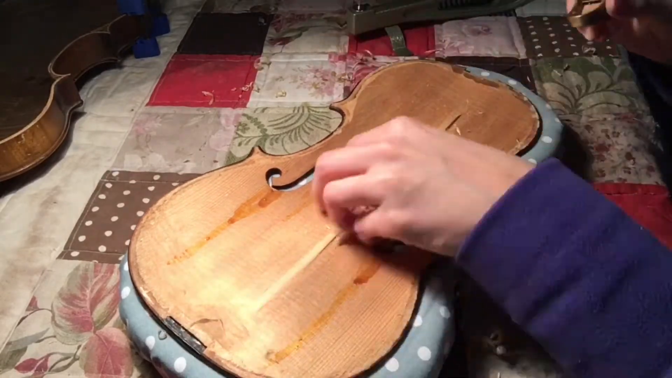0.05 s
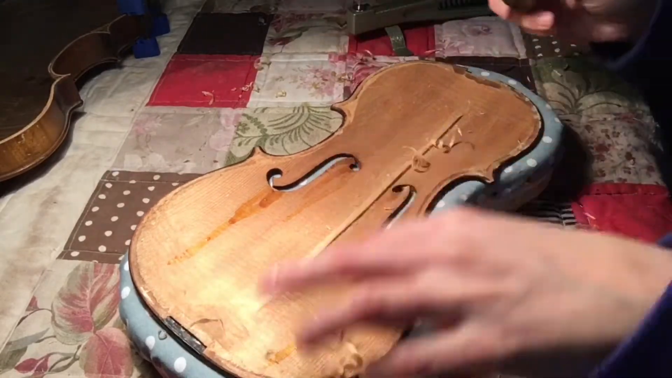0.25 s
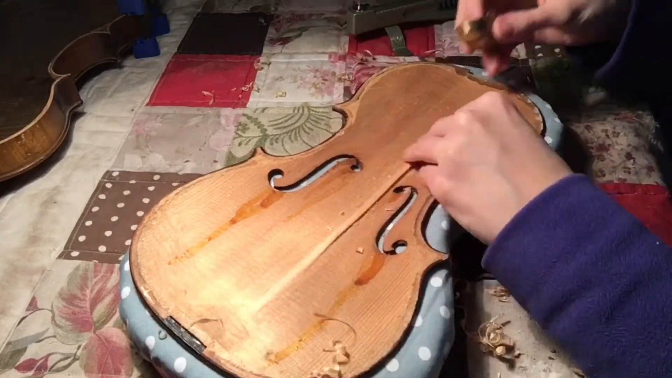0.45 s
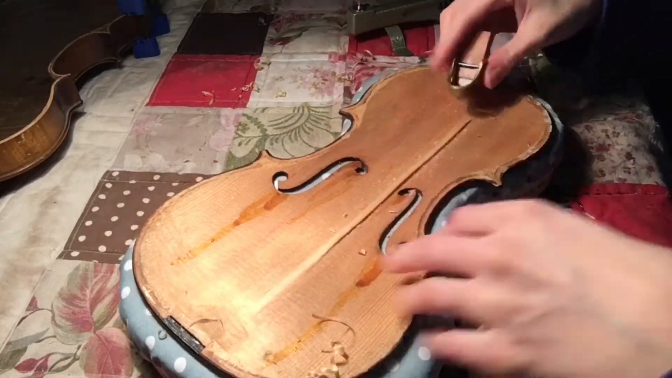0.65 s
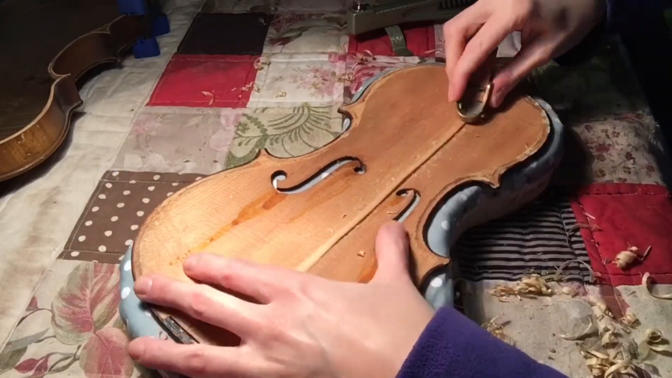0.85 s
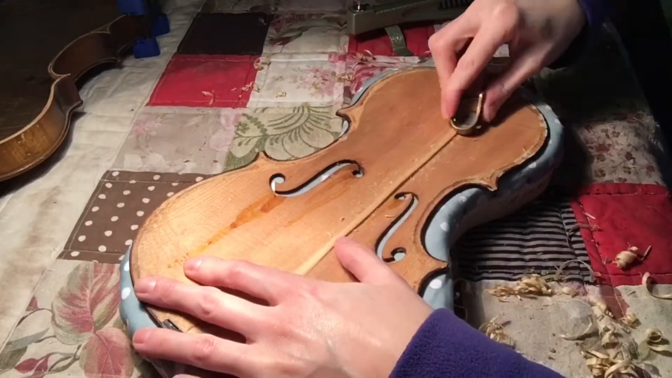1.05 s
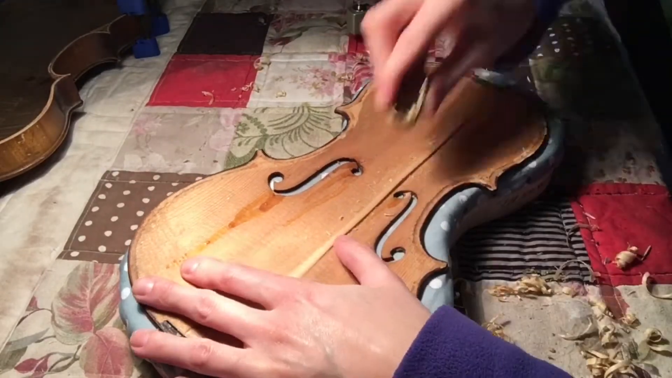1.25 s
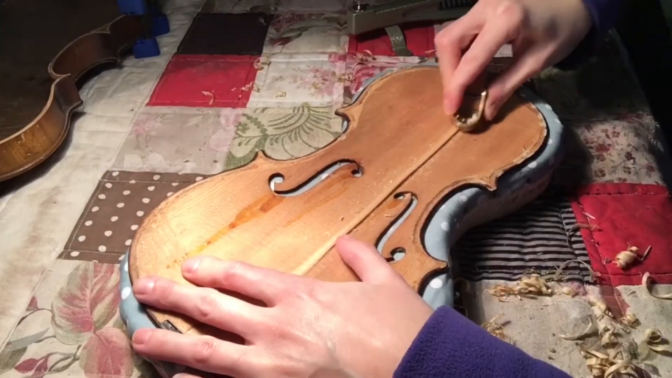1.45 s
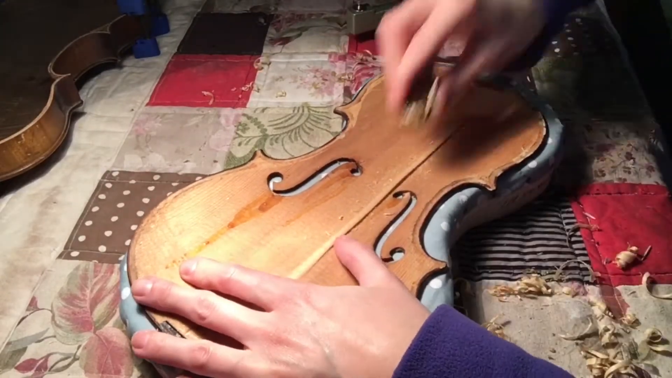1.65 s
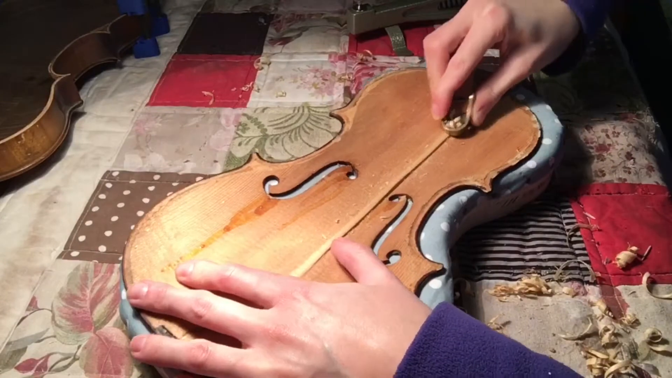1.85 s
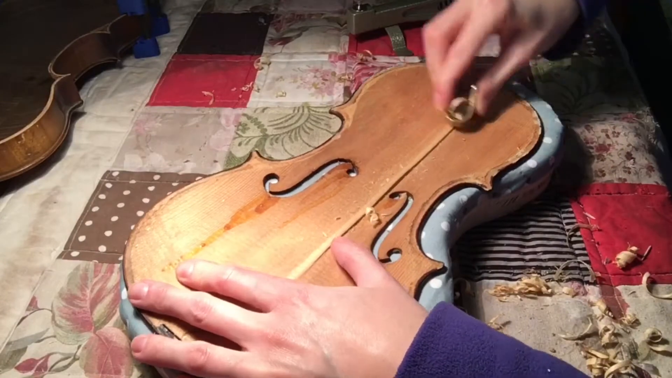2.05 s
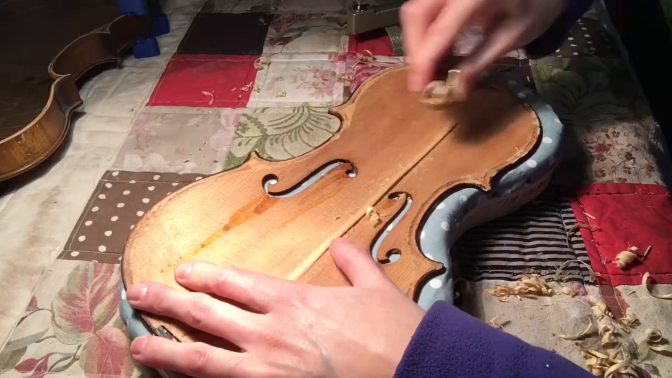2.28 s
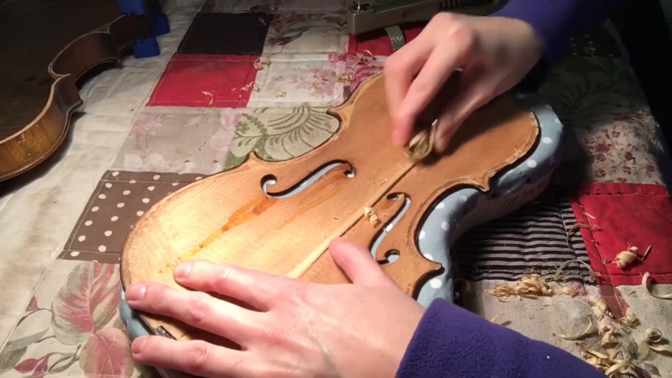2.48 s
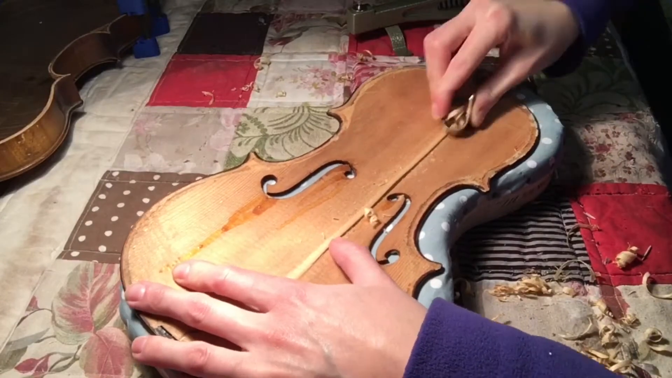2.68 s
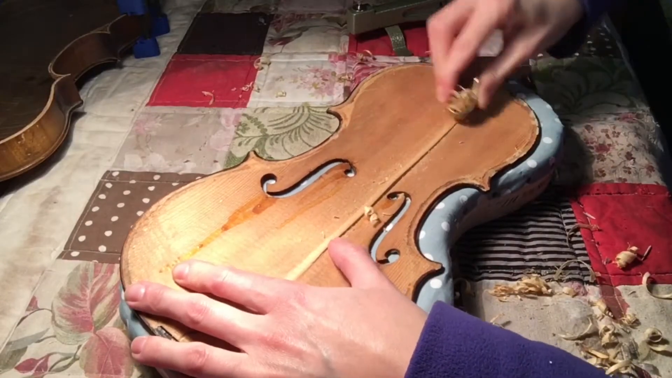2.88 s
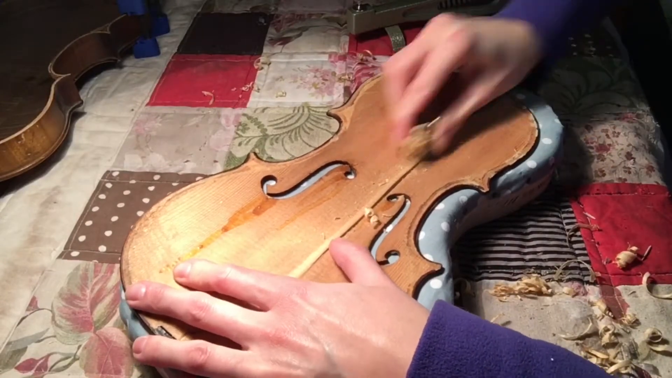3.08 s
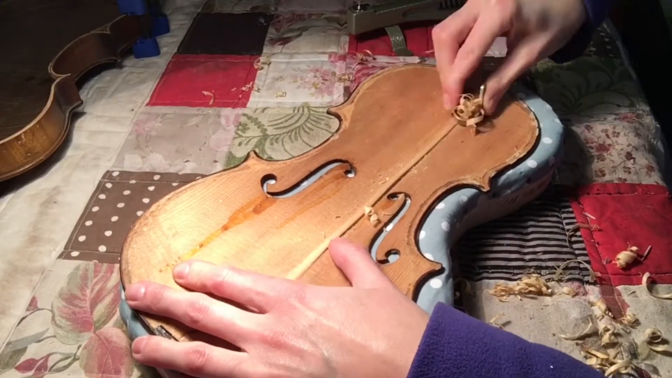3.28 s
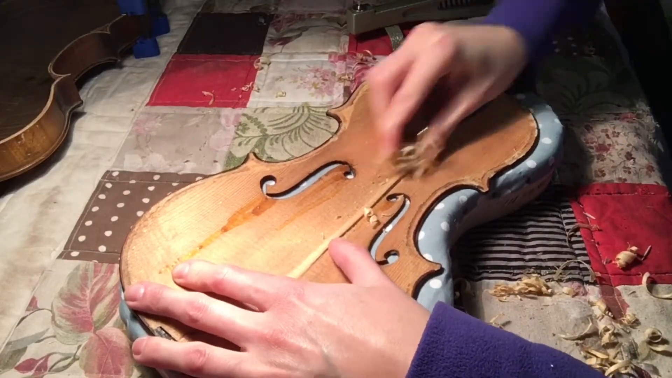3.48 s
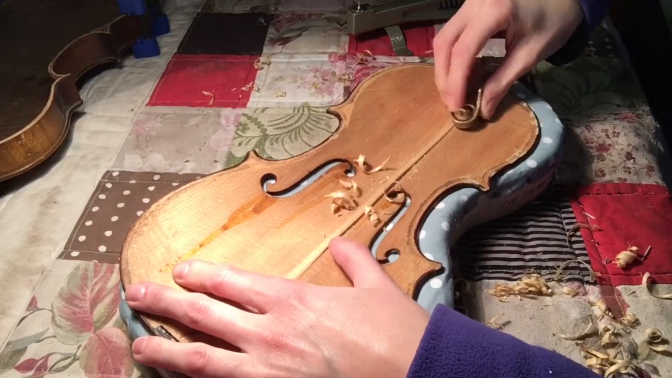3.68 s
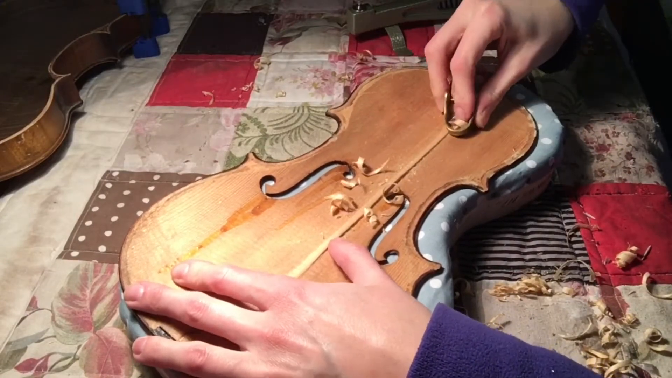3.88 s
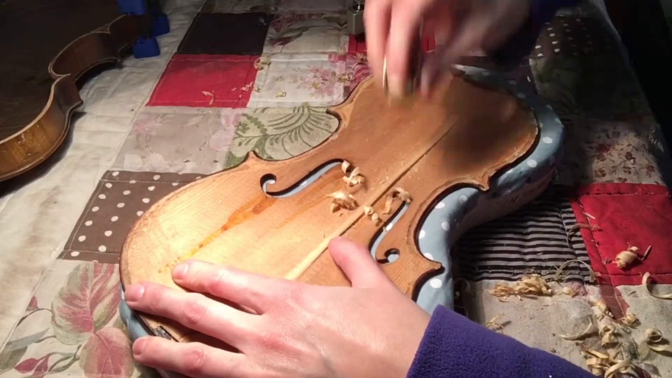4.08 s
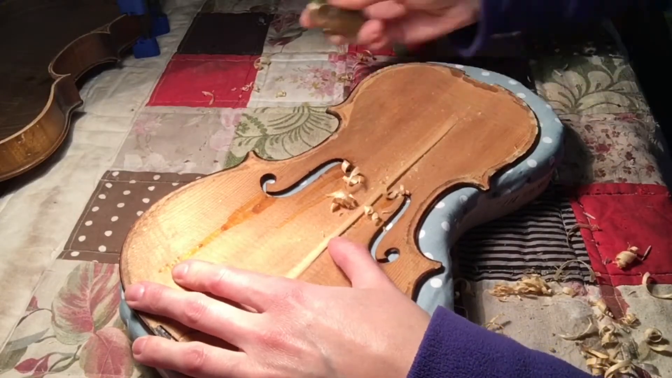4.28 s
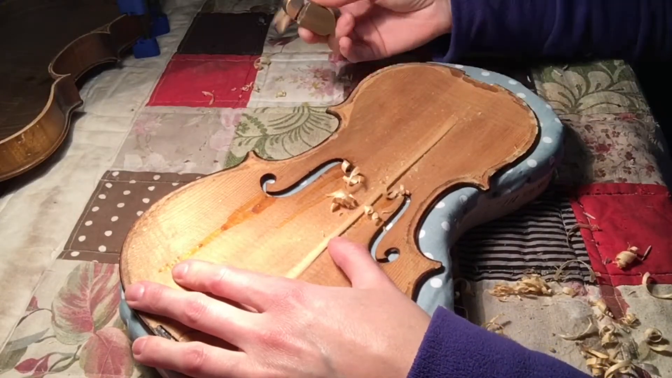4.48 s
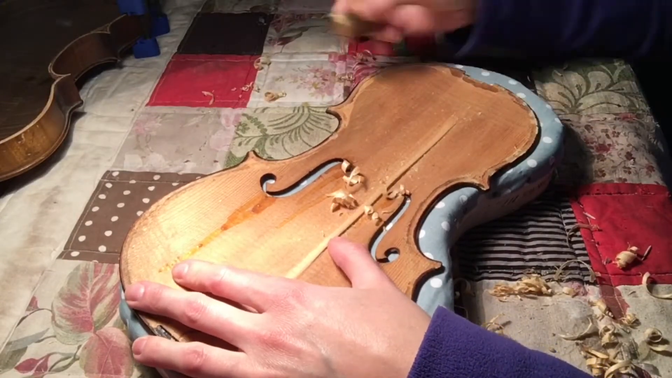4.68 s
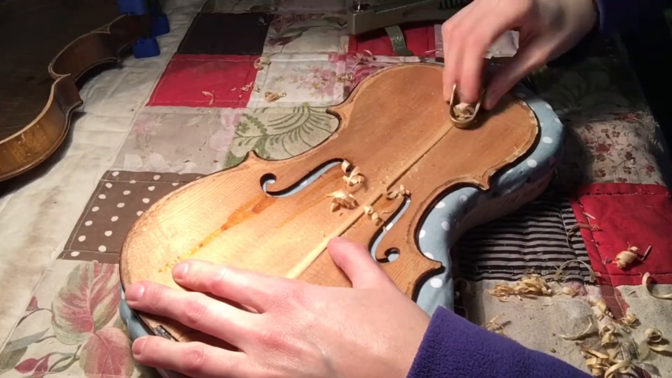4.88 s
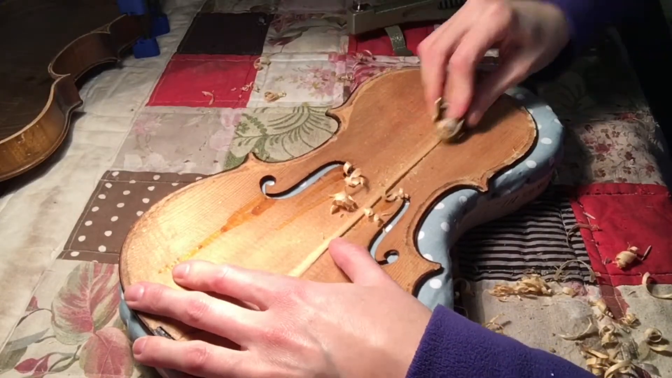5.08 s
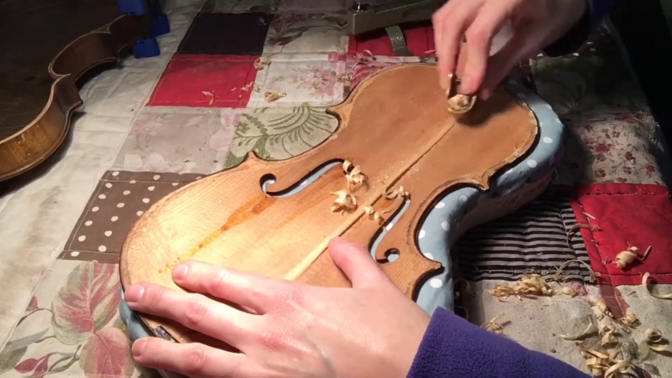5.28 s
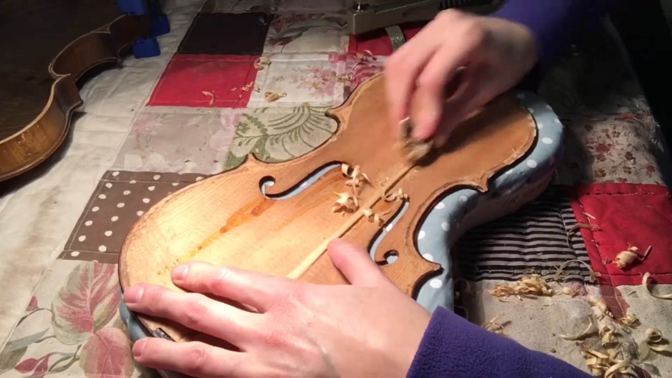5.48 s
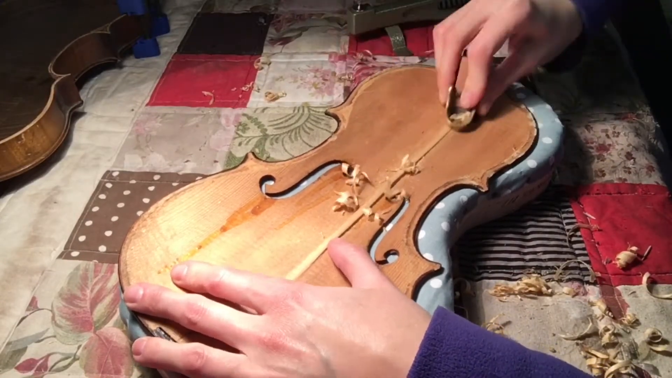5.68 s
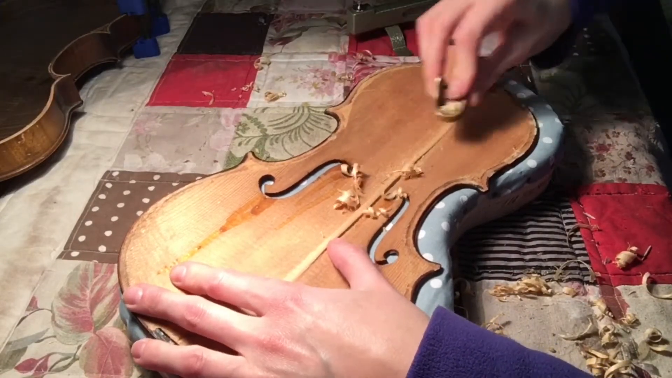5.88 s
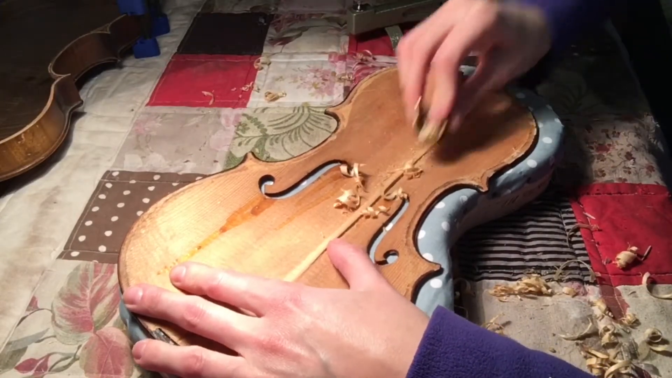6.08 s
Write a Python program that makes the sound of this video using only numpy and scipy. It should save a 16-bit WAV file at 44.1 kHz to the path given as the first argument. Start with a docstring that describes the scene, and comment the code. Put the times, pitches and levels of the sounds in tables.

```python
"""A small, quiet workshop: a thumb plane shaves the spruce top of a violin that lies on a padded bench.
A hand first sweeps the shavings off. Then the plane, often set down with a tap, slides with a hiss stroke by stroke.
Uneven slips of its blade make a low judder; snapping fibres and a ragged squeak make the dry rasp that follows.
Resonances of the plane and the wooden box ring along, and a short room tail and faint air noise lie behind."""
import sys
import numpy as np
from scipy import signal
from scipy.fft import rfft, irfft, next_fast_len
from scipy.io import wavfile
from scipy.ndimage import uniform_filter1d, map_coordinates

SR = 44100
rng = np.random.default_rng(int(sys.argv[2]) if len(sys.argv) > 2 else 0)


def output_pcm(signal):
    """Save a mono or channel-first signal as 16-bit PCM at the path in sys.argv[1].

    Samples are clipped to [-1, 1] before scaling.
    """
    pcm = np.clip(np.atleast_2d(signal).T, -1, 1) * 32767
    wavfile.write(sys.argv[1], SR, np.round(pcm).astype(np.int16))


N = 270774

# All levels in the tables are relative: the functions below still scale or filter them.

# Strokes of the plane. Each row: moment the blade bites in seconds, run-up of the sole in seconds,
# lead-in of the blade in seconds, length of the judder in seconds, length of the cut in seconds,
# hiss at first touch in dB, hiss in the cut in dB, judder in dB, rasp in dB, thud in dB,
# base slip rate in Hz, base rasp pitch in Hz (both glide around these values).
STROKES = [(1.197, 0.078, .06, 0.034, 0.057, -71, -42, -38, -30, -47, 360.3, 1380),
           (1.602, 0.034, 0.033, 0.034, .054, -53.5, -43.5, -34.5, -33, -48.5, 402, 1390),
           (1.931, 0.093, 0.024, 0.028, .055, -62.5, -43.5, -34, -34.5, -47.5, 440.4, 1380),
           (2.207, 0.047, 0.014, .03, .06, -62, -42.5, -29.5, -33.5, -60, 311.4, 1490),
           (2.479, 0.063, 0.032, 0.039, 0.053, -64, -44, -31, -37, -51, 380.3, 1620),
           (2.755, 0.042, 0.017, 0.058, .066, -61, -43.5, -38.5, -32, -51.5, 429, 1380),
           (3.106, 0.042, 0.02, 0.03, 0.055, -60, -42.5, -31.5, -34, -48, 370.5, 1500),
           (3.485, 0.055, 0.044, .048, 0.067, -57, -43.5, -35, -32.5, -48.5, 378.5, 1430),
           (3.995, 0.12, 0.072, 0.047, .08, -70.5, -43, -38, -32.5, -44.5, 350.2, 1199),
           (5.128, 0.073, 0.049, 0.039, 0.064, -62.5, -42.5, -34, -35, -45.5, 301.7, 1390),
           (5.468, 0.093, 0.038, 0.07, 0.08, -58.5, -45, -38, -36, -47.5, 329.8, 1420),
           (5.783, .06, 0.01, 0.026, 0.071, -63, -42, -35, -38, -44, 461.5, 1520),
           (6.036, 0.034, 0.054, 0.077, 0.062, -64, -43, -41, -40, -47, 368.8, 1300)]
# Stages of a cut. Each list: level in dB at the first graze, lead-in, bite, turn from judder to rasp,
# blade leaving, chip breaking off, and end.
JUDDER_STAGES_DB = [-31.5, -17.5, 2, -2, -10.5, -22.5, -40]
RASP_STAGES_DB = [-38, -30.5, -13, 0.5, 1, -5.5, -52]
# The plane is set down, or once (at 2.925 seconds) drags dully.
# Each row: start in seconds (the contact peaks slightly later), hollow knock in dB, clack in dB,
# gritty tick in dB.
CONTACTS = [(0.711, -87, -54, -54), (1.039, -62, -55.5, -69), (1.135, -52, -43, -55),
            (1.813, -48, -58.5, -68), (2.124, -39, -42.5, -57.5), (2.408, -40, -36, -61),
            (2.676, -43.5, -43.5, -54.5), (2.925, -62, -65.5, -85), (3.722, -37, -36.5, -55.5),
            (5.38, -42, -45, -61), (5.716, -44.5, -41, -53.5), (5.984, -41, -47, -67.5),
            (6.004, -53, -40, -58)]
# The sole drags lightly as it is drawn back and lined up.
# Each row: start in seconds, rise in seconds, hold in seconds, fall in seconds, level in dB.
DRAGS = [(.855, 0.037, 0.037, 0.11, -64.5), (.965, 0.05, 0.026, 0.11, -62.5),
         (1.466, 0.035, .008, .07, -60.5), (1.53, 0.045, .008, 0.033, -55),
         (2.995, 0.048, 0.021, .027, -56), (3.375, 0.063, .015, 0.068, -60.5),
         (4.94, .03, 0.0053, 0.047, -65.5), (5.032, 0.046, 0.0068, .025, -63.5)]
# The sole scuffs while it feels for its line.
# Each row: start in seconds, length in seconds, average pitch in Hz, level in dB.
SCUFFS = [(0.872, 0.025, 360, -70), (0.926, 0.019, 1337, -60), (0.978, 0.036, 1438, -57.5),
          (1.046, .08, 960, -52), (1.087, 0.029, 1550, -39), (1.546, 0.016, 944, -46.5),
          (1.882, 0.029, 1547, -42), (3.888, 0.019, 2130, -54), (3.945, 0.02, 526, -43.5),
          (4.942, 0.035, 960, -59.5)]
# The hand sweeps over the plate.
# Each row: start in seconds, rise in seconds, hold in seconds, fall in seconds, level in dB.
SWEEPS = [(.1, 0.041, 0.041, 0.099, -44.5), (.2, 0.044, 0.0056, 0.022, -54.5), (.24, .04, 0.043, 0.25, -68),
          (.465, .04, 0.075, 0.061, -52.5), (.6, .04, 0.0064, 0.039, -50),
          (.69, 0.023, 0.0034, 0.021, -57.5), (.716, .012, .004, 0.015, -53.5)]
# Loose shavings rustle as the plane is lifted and cleared.
# Each row: start in seconds, rise in seconds, hold in seconds, fall in seconds, level in dB.
RUSTLES = [(3.765, 0.053, 0.011, 0.074, -64), (4.13, .05, 0.035, 0.036, -63.5),
           (4.245, 0.051, 0.019, 0.044, -78), (4.447, 0.031, .008, 0.065, -71.5),
           (4.503, 0.037, 0.018, 0.036, -60), (4.65, 0.017, 0.044, 0.042, -70.5),
           (5.657, .02, .005, 0.023, -68)]

# Resonances of the plane and the plate under it. Each row: frequency in Hz, width in Hz, level in dB.
BLADE_MODES = [(2042, 35, -1.5), (2833, 63, 2.5), (3496, 120, -3.5), (4096, 280, -4.5), (5580, 340, -7.5),
               (5900, 230, -36), (8700, 310, -14)]
# Resonances of the violin box on its pad. Each row: frequency in Hz, width in Hz, level in dB.
BOX_MODES = [(58.6, 3.9, 1.5), (98.6, 12, -2.5), (141.2, 8.9, -2), (193, 23, 3), (248.7, 6.3, -3.5),
             (323.5, 15, -1), (478.6, 44, -3), (645, 22, -0.5), (950, 18, -27), (1096, 14, -16),
             (1347, 15, -8), (1480, 28, -10.5), (1570, 60, -16)]

# Colours: how strong each noise is from bass to treble. Each row: frequency in Hz, level in dB.
# First the cut: low judder, tearing fibres, the violin rocking on its pad, the sliding sole.
JUDDER_COLOUR = [(50, -19), (120, -10.5), (200, -0.5), (330, 2.5), (480, 1.5), (630, -6), (800, -14.5),
                 (1500, -22), (4000, -35), (15000, -65)]
RASP_COLOUR = [(60, -31), (230, -3.5), (560, -12.5), (800, -11), (1000, -3), (1350, 1.5), (1630, 6),
               (1900, -9), (2400, -13), (3300, -28), (6000, -39.5)]
THUD_COLOUR = [(25, -41.5), (45, -25), (59, 8), (75, -4.5), (100, 0), (120, 1), (141, 5.5), (170, -8),
               (300, -15), (1000, -70.5)]
HISS_COLOUR = [(80, 2), (300, 8.5), (550, 3.5), (800, 4.5), (1550, 6.5), (2400, -3.5), (4000, -1.5),
               (6300, -2.5), (7200, -4), (7900, -10), (9000, -10), (11000, -15), (13000, -18), (16000, -20)]
# Colours of a contact, same columns: hollow knock, clack, gritty tick.
KNOCK_COLOUR = [(60, -26.5), (200, -7.5), (270, -1), (370, -2), (460, 7), (640, -3), (900, -7.5),
                (3000, -80)]
CLACK_COLOUR = [(300, -20.5), (700, -6.5), (950, -3), (1200, -1.5), (1600, 4.5), (1850, -17.5), (2100, -4),
                (2500, -19), (3300, -19), (5000, -50), (10000, -43)]
TICK_COLOUR = [(1000, -22.5), (2700, 6), (4200, 7), (5500, 3), (7000, 2), (10000, -15.5), (16000, -26.5)]
# Colours of the rest, same columns: sweeping palm, dry curls of wood, faint air noise.
PALM_COLOUR = [(150, -21), (250, -23), (335, -18), (442, -13.5), (583, -14.5), (1070, -3), (1250, -8),
               (1460, -5.5), (2360, -11.5), (3330, -8), (3890, -13), (6000, -13.5), (8470, -23.5),
               (15500, -26.5)]
CURLS_COLOUR = [(700, -11), (1800, -0.5), (4000, 1.5), (6200, 5.5), (9000, -4.5), (15000, -4.5)]
AIR_COLOUR = [(15, -24), (25, -30), (37, -6), (59, 2), (82, -14.5), (129, -7), (164, -12), (246, -9.5),
              (281, -18), (331, -12), (389, -17), (457, -17.5), (1850, -21.5), (15500, -41.5)]

# a rise or fall time in the tables covers this many dB
FADE_DB = 20
# the hiss fades in before the touch, is full shortly after the bite, and dies as the plane lifts
TOUCH_S, FULL_AFTER_BITE_S, LIFT_DB_PER_S = 0.011, 0.011, 580
# graze before the lead-in; chip breaking and silence after the blade leaves
GRAZE_S, BREAK_S, SETTLE_S = 0.058, 0.0067, 0.068
# air noise before the recorder's filters, and the recorder's upper limit
AIR_DB, TOP_HZ = -72, 15750

# time axis in seconds and frequency axis in Hz
T = np.arange(N) / SR
SIZE = next_fast_len(N + SR)
FREQ = np.maximum(np.arange(SIZE // 2 + 1) * SR / SIZE, 1)


def undb(db):
    """Turn decibels into gain."""
    return 10 ** (np.asarray(db) / 20)


def unit(x):
    """Scale to an rms (average strength) of 1."""
    return x / np.sqrt(np.mean(x ** 2))


def noise():
    """White noise: all frequencies equally strong, rms about 1."""
    return rng.standard_normal(N)


def swell(times, dbs):
    """Gain through points in seconds and dB, practically silent outside them."""
    return undb(np.interp(T, times, dbs, left=-200, right=-200))


def gestures(rows):
    """Gain of light movements that each rise, hold and fall."""
    power = 0
    for start, rise, hold, fall, db in rows:
        before = np.maximum(start - T, 0) / rise
        after = np.maximum(T - start - hold, 0) / fall
        level_db = db - FADE_DB * np.minimum(before + after, 10)
        power = power + undb(level_db) ** 2
    return np.sqrt(power)


def colour(points):
    """Frequency response through points in Hz and dB that never sounds ahead of its input."""
    hz, db = np.transpose(points)
    smooth_db = np.interp(np.log(FREQ), np.log(hz), db)
    # folding the cepstrum (spectrum of the log spectrum) gives minimum phase
    cepstrum = irfft(np.log(undb(smooth_db)), SIZE)
    cepstrum[1:SIZE // 2] *= 2
    cepstrum[SIZE // 2 + 1:] = 0
    return np.exp(rfft(cepstrum))


def modes(rows):
    """Frequency response of resonances; a narrower one rings longer."""
    response = 0
    for hz, width, db in rows:
        response = response + undb(db) / (1 + 1j * (FREQ ** 2 - hz ** 2) / (FREQ * width))
    return response


def through(x, response):
    """Filter by a frequency response."""
    return irfft(rfft(x, SIZE) * response, SIZE)[:N]


def ring(x, response):
    """Filter by a response scaled to keep the power of white noise."""
    return through(x, response / np.sqrt(np.mean(np.abs(response) ** 2)))


def fibres(per_s, spread_db):
    """Dense clicks of snapping wood fibres, at random moments and uneven in size."""
    size = undb(spread_db * np.clip(noise(), -2, 2))
    snaps = rng.random(N) < per_s / SR
    return unit(snaps * size * np.sign(noise()))


def steady(x, span_s):
    """Even out the power over span_s seconds: the hand pushes with a steady force."""
    return x / np.sqrt(uniform_filter1d(x ** 2, int(span_s * SR)) + 1e-12)


def stick_slip(hz, jitter, spread_db):
    """The blade sticks and slips: uneven clicks, and the phase from 0 to 1 between two slips."""
    wander = unit(uniform_filter1d(noise(), size=130))
    turns = np.cumsum(hz * np.exp(jitter * wander)) / SR
    # one click per whole turn
    slips = np.diff(np.floor(turns), prepend=0) * undb(spread_db * noise())
    without_drift = slips - uniform_filter1d(slips, size=600)
    return without_drift, turns % 1


def squeak(hz, jitter, flutter_db, octave_db):
    """Fast, ragged stick-slip: a tone and its second harmonic, wavering so quickly that they rasp."""
    wander = unit(uniform_filter1d(noise(), size=70))
    angle = 2 * np.pi * np.cumsum(hz * np.exp(jitter * wander)) / SR
    strength = undb(flutter_db * unit(uniform_filter1d(noise(), size=110)))
    tone = np.sin(angle) + undb(octave_db) * np.sin(2 * angle)
    return unit(strength * tone)


def cutting():
    """Each stroke: the blade judders ever more slowly as it digs in, then tears fibres until it leaves the wood."""
    judder_gain, rasp_gain, thud_gain = 0, 0, 0
    times, rates, pitches = [], [], []
    for bite, _, lead, judder_s, cut_s, _, _, judder_db, rasp_db, thud_db, slip_hz, rasp_hz in STROKES:
        leave = bite + cut_s
        moments = np.sort([bite - lead - GRAZE_S, bite - lead, bite, bite + judder_s,
                           leave, leave + BREAK_S, leave + SETTLE_S])
        judder_gain = judder_gain + swell(moments, judder_db + np.array(JUDDER_STAGES_DB))
        rasp_gain = rasp_gain + swell(moments, rasp_db + np.array(RASP_STAGES_DB))
        thud_times = [bite - .12, bite, leave, leave + 0.1]
        thud_gain = thud_gain + swell(thud_times, thud_db + np.array([-25.5, -3.0, 0, -28.5]))
        # slips and squeak both slow down during the cut
        times += [bite - .02, leave]
        rates += [slip_hz * 1.02, slip_hz * .66]
        pitches += [rasp_hz * 1.16, rasp_hz * .95]

    slips, phase = stick_slip(np.interp(T, times, rates), jitter=.32, spread_db=5.0)
    judder = steady(ring(slips, colour(JUDDER_COLOUR)), span_s=0.014)

    # fibres snap hardest just after a slip
    release = unit(np.exp(-phase / 1.17))
    snapping = fibres(per_s=3500, spread_db=1) * release
    tearing = steady(ring(snapping, colour(RASP_COLOUR)), span_s=0.01)
    blade_squeak = squeak(np.interp(T, times, pitches), jitter=.13, flutter_db=0.5, octave_db=-30.5)
    rasp = undb(-0.95) * tearing + undb(-3.5) * blade_squeak

    # the push of the blade rocks the violin on its pad
    thud = steady(ring(noise(), colour(THUD_COLOUR)), span_s=0.06)
    cut = undb(-0.22) * judder * judder_gain + rasp * rasp_gain + undb(-1.5) * thud * thud_gain
    return cut, release


def sliding(release):
    """The sole rubs and the shaving curls out: a fine, grainy hiss that throbs with the slips."""
    gain = gestures(DRAGS)
    for bite, run_up, _, _, cut_s, touch_db, hiss_db, *_ in STROKES:
        touch, leave = bite - run_up, bite + cut_s
        pressing_db = np.interp(T, [touch, bite + FULL_AFTER_BITE_S], [touch_db, hiss_db])
        fade_in_db = FADE_DB * np.maximum(touch - T, 0) / TOUCH_S
        lift_db = LIFT_DB_PER_S * np.maximum(T - leave, 0)
        fading_db = np.minimum(fade_in_db + lift_db, 10 * FADE_DB)
        gain = np.hypot(gain, undb(pressing_db - fading_db))
    grains = fibres(per_s=11000, spread_db=4.0) * release + undb(-4.5) * noise()
    return undb(4.0) * ring(unit(grains), colour(HISS_COLOUR)) * gain


def touching(peak_s, rise_s, fall_s, graze_s, graze_db):
    """The curved sole grazes, then lands (or once drags dully) in a short rattle of knock, clack and tick."""
    gains = 0
    for start, *dbs in CONTACTS:
        age = T - start - peak_s
        before, after = np.clip(-age, 0, 1), np.clip(age, 0, 1)
        approach = np.exp(-before / rise_s)
        graze = undb(graze_db) * np.exp(-before / graze_s)
        contact = np.maximum(approach, graze) * np.exp(-after / fall_s)
        gains = gains + np.outer(undb(dbs), contact)
    knock_gain, clack_gain, tick_gain = gains
    knock = steady(ring(fibres(per_s=1600, spread_db=2.0), colour(KNOCK_COLOUR)), span_s=0.018)
    clack = steady(ring(fibres(per_s=3300, spread_db=5), colour(CLACK_COLOUR)), span_s=0.012)
    tick = ring(fibres(per_s=14000, spread_db=3.5), colour(TICK_COLOUR))
    return undb(2.5) * knock * knock_gain + undb(4.5) * clack * clack_gain + undb(3.0) * tick * tick_gain


def scuffing(rise_s, fall_s):
    """Brief, rough squeaks as the sole sticks and slips on the bare wood."""
    scuffs = 0
    for start, length, hz, db in SCUFFS:
        tone = squeak(hz, jitter=0.14, flutter_db=5.5, octave_db=-12)
        scuffs = scuffs + tone * gestures([(start, rise_s, length, fall_s, db)])
    return scuffs


def sweeping():
    """Skin and loose shavings brush over the bare wood: very many small clicks."""
    brushing = fibres(per_s=20000, spread_db=3.0) * gestures(SWEEPS)
    return undb(-2.0) * ring(brushing, colour(PALM_COLOUR))


def rustling():
    """Dry curls of wood crinkle against the fingers: many small, bright clicks."""
    crinkle = fibres(per_s=14000, spread_db=1.0) * gestures(RUSTLES)
    return ring(crinkle, colour(CURLS_COLOUR))


def hand_echo(x, lag_s, sway_s, db):
    """The hand throws the treble back a moment later; the lag changes as it moves, so the colour shifts."""
    spots = np.linspace(0, T[-1], num=60)
    sway = np.interp(T, spots, rng.uniform(-0.97, 1, len(spots)))
    lag = lag_s + sway_s * sway
    treble = signal.sosfilt(signal.butter(2, 900, "highpass", fs=SR, output="sos"), x)
    return x + undb(db) * map_coordinates(treble, [np.arange(N) - lag * SR], order=3)


def workshop(x, t60_dull, t60_bright, wet_db):
    """A short room tail whose treble dies first; a t60 is the seconds taken to fall by 60 dB."""
    age = T[:SR // 2]
    dull = through(noise(), 1 / (1 + 1j * FREQ / 4200) ** 2)[:len(age)]
    bright = through(noise(), 1 / (1 + 1j * FREQ / 7000))[:len(age)]
    tail = dull * undb(-60 * age / t60_dull) + undb(1.0) * bright * undb(-60 * age / t60_bright)
    # the tail starts after 4 ms
    tail = tail * (age > .004)
    return x + undb(wet_db) * signal.fftconvolve(x, tail)[:N] / np.sqrt(np.sum(tail ** 2))


def air():
    """Faint, steady air noise, mostly low."""
    return undb(AIR_DB) * unit(ring(noise(), colour(AIR_COLOUR)))


def scene():
    """The plane drives its own resonances and the violin box; the room adds a tail and faint air noise."""
    cut, release = cutting()
    plane = cut + sliding(release)
    plane = plane + touching(peak_s=0.0056, rise_s=0.007, fall_s=0.0094, graze_s=0.016, graze_db=-11.5)
    plane = plane + undb(-0.5) * scuffing(rise_s=0.022, fall_s=0.0097)
    # the 1 is the direct sound of the plane
    body = 1 + undb(1.0) * modes(BLADE_MODES) + undb(1.5) * modes(BOX_MODES)
    wood = undb(-2.5) * through(plane, body)
    near = hand_echo(wood + sweeping() + rustling(), lag_s=.002, sway_s=0.00053, db=-7.5)
    room = workshop(near, t60_dull=0.22, t60_bright=0.065, wet_db=-19.0)
    # one row: a single channel
    return (room + air())[None]


def record(dry):
    """The microphone loses the deepest bass and the recorder cuts the top."""
    lean = signal.sosfilt(signal.butter(2, 36, "highpass", fs=SR, output="sos"), dry)
    return signal.sosfilt(signal.ellip(12, .1, 70, TOP_HZ, fs=SR, output="sos"), lean)


dry = scene()
out = record(dry)
output_pcm(out)
```